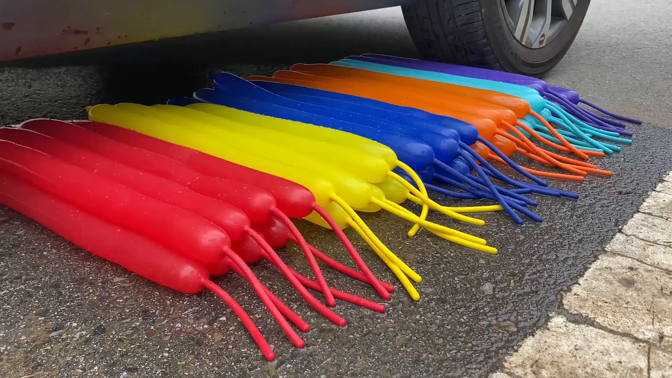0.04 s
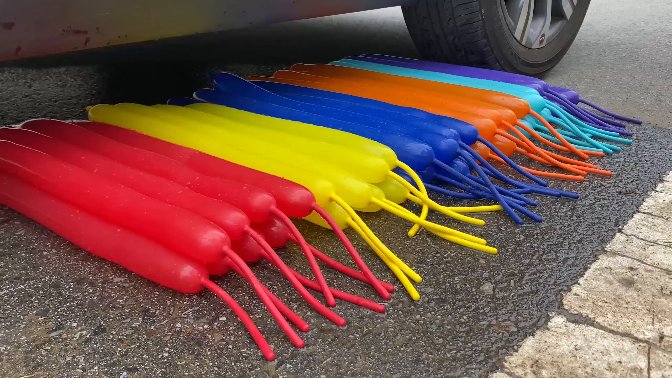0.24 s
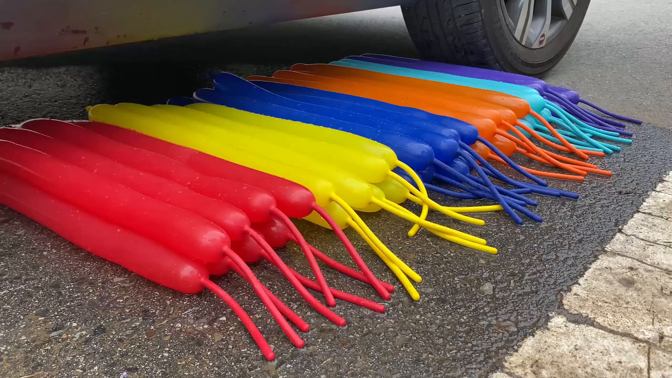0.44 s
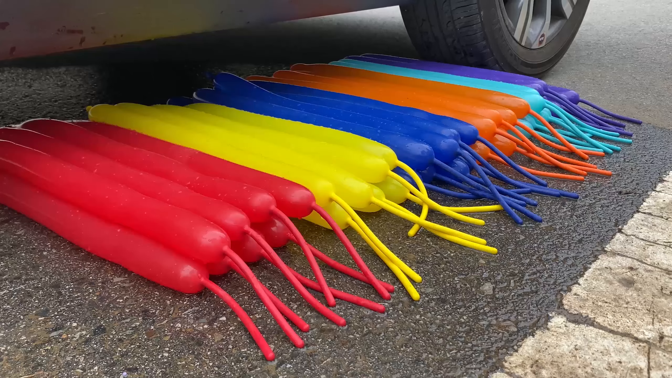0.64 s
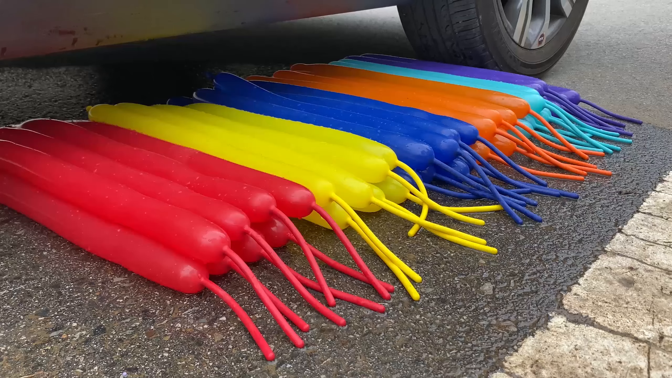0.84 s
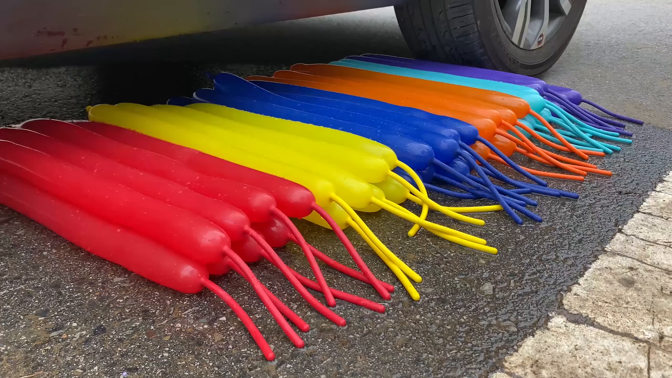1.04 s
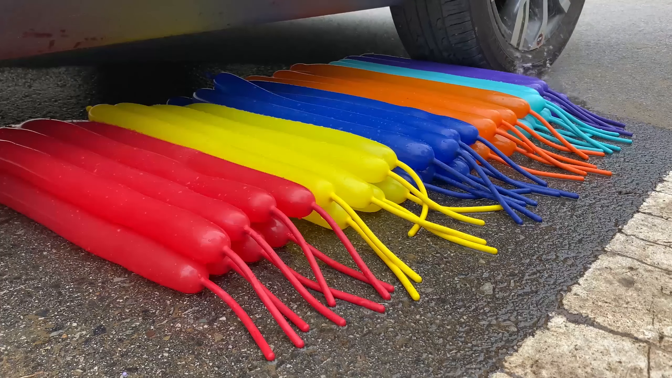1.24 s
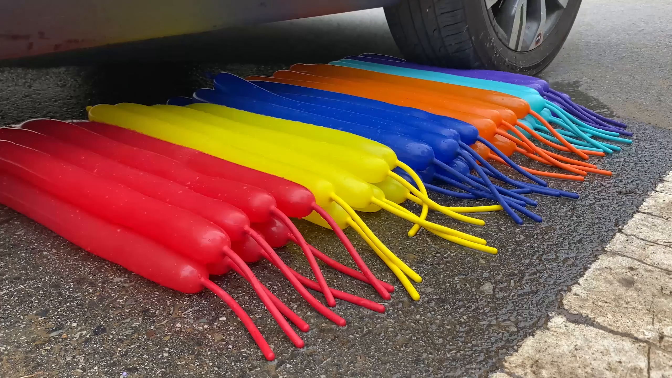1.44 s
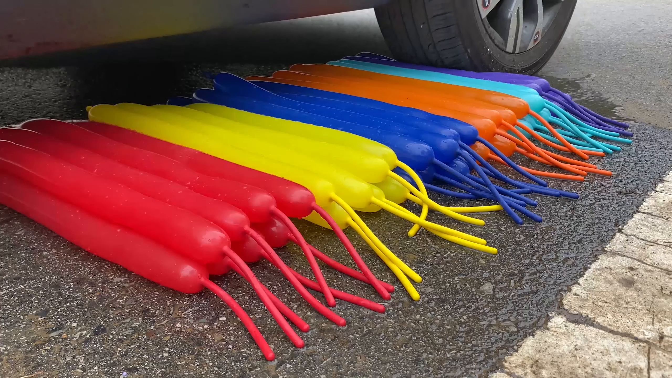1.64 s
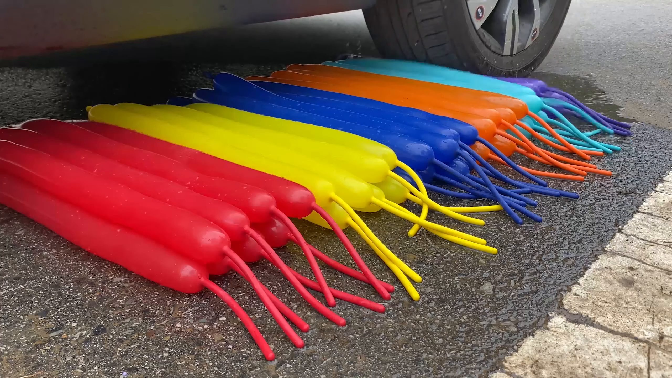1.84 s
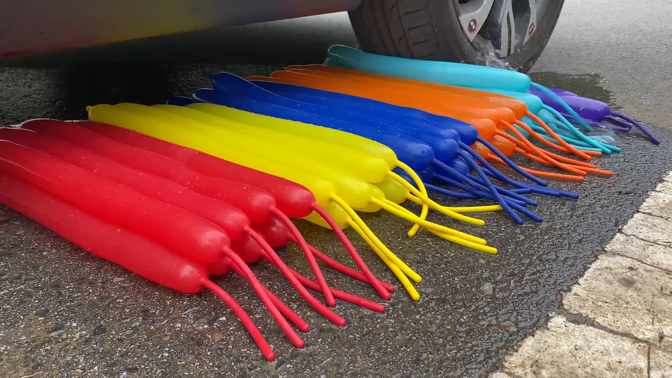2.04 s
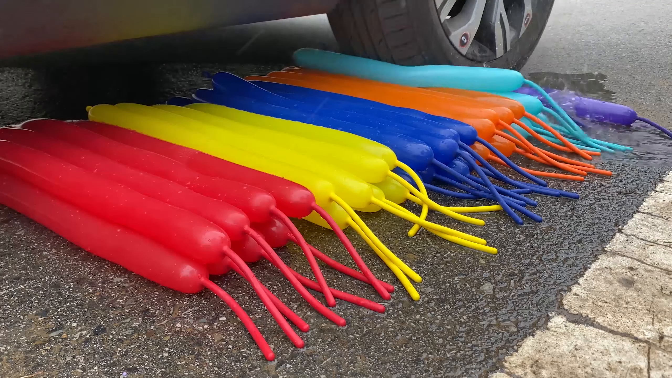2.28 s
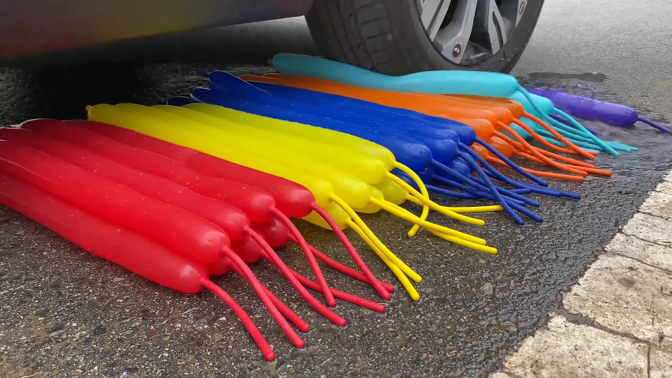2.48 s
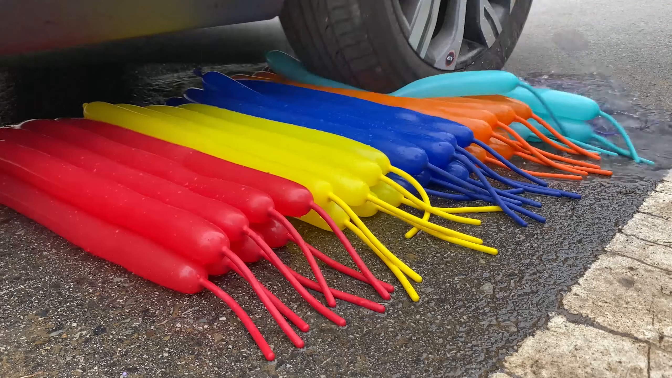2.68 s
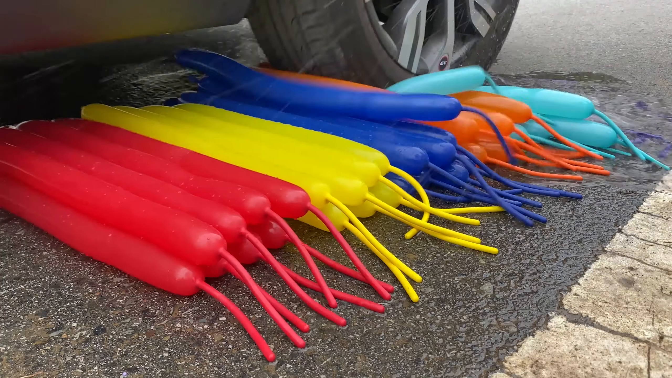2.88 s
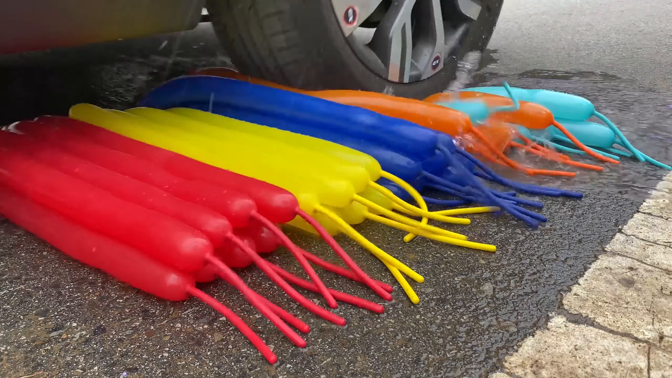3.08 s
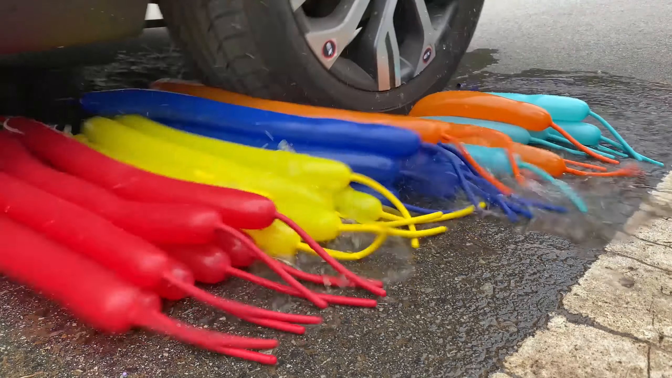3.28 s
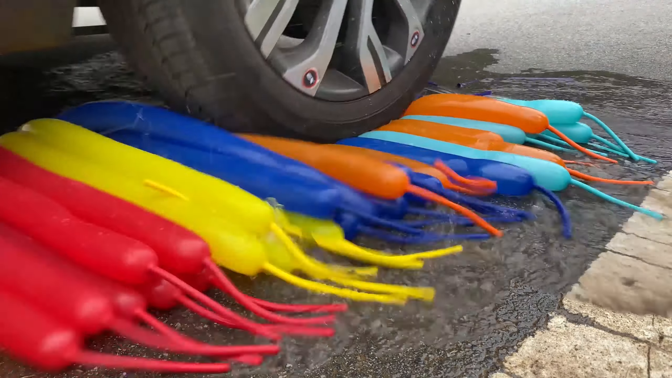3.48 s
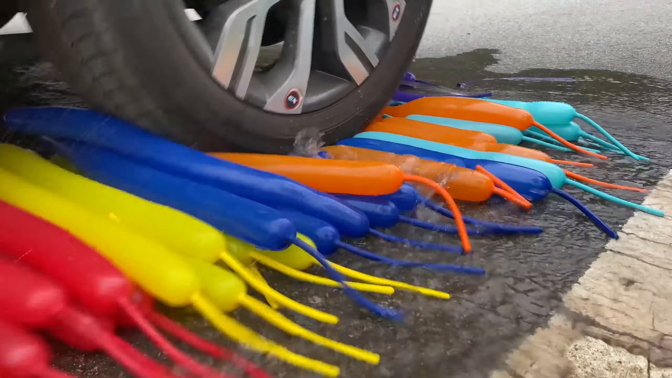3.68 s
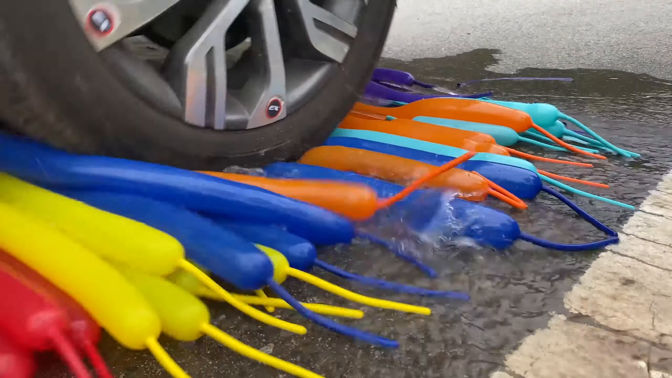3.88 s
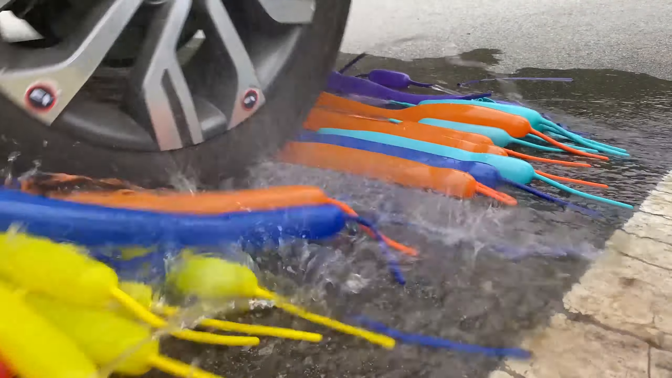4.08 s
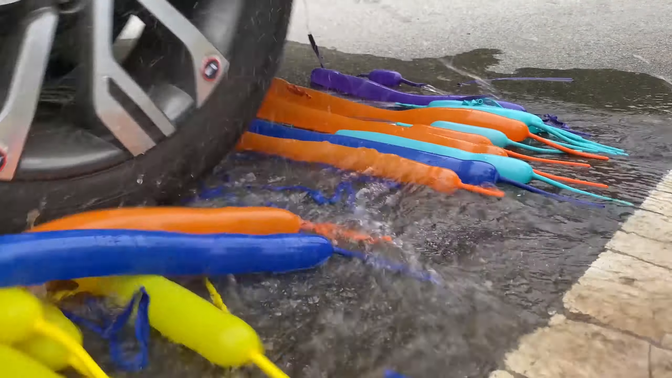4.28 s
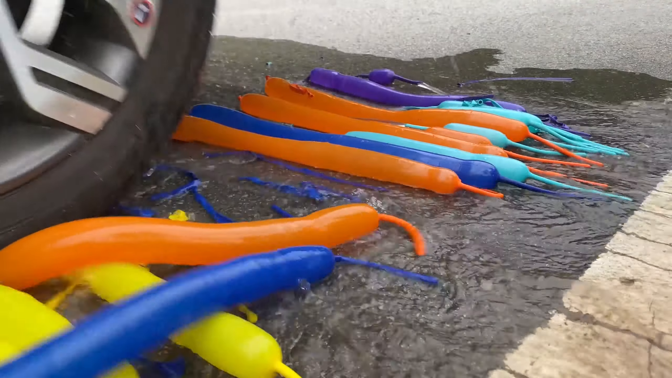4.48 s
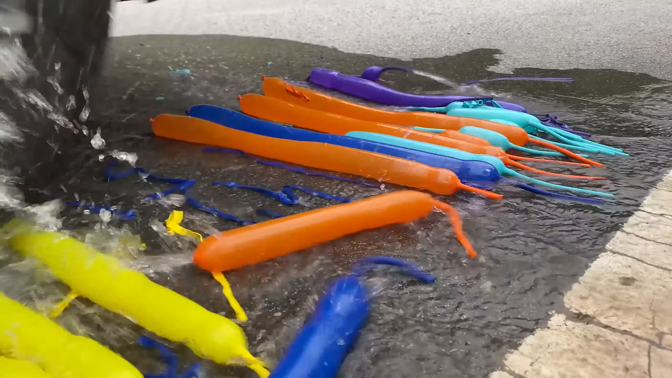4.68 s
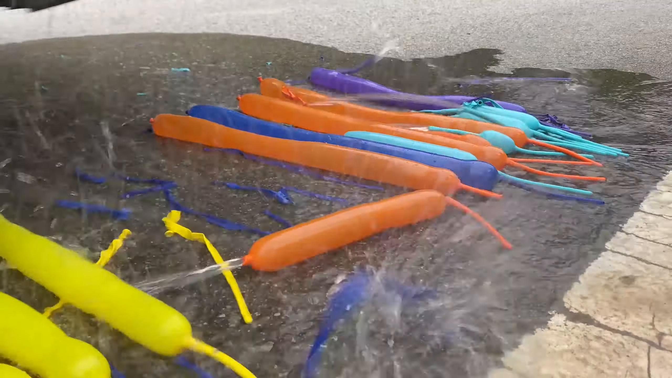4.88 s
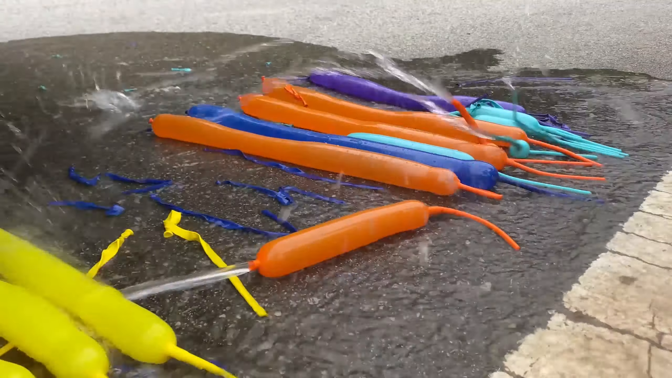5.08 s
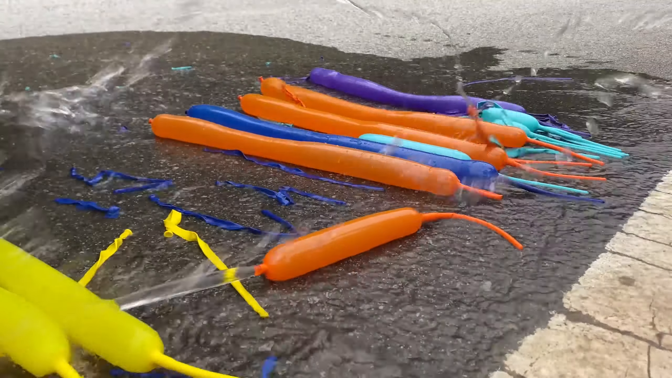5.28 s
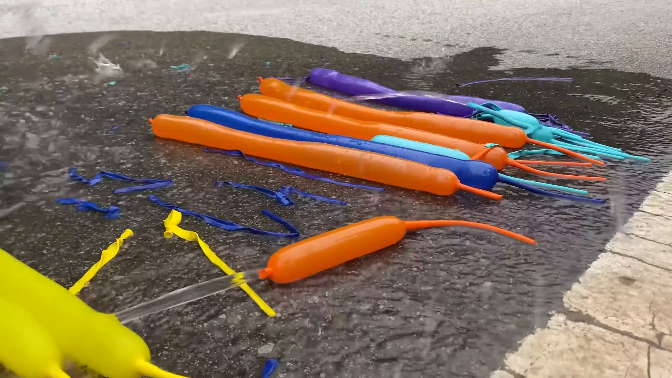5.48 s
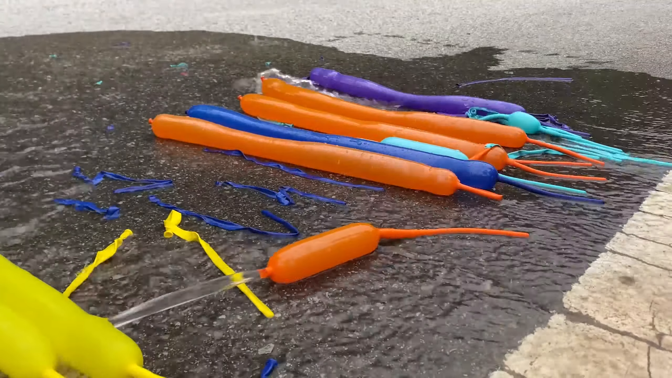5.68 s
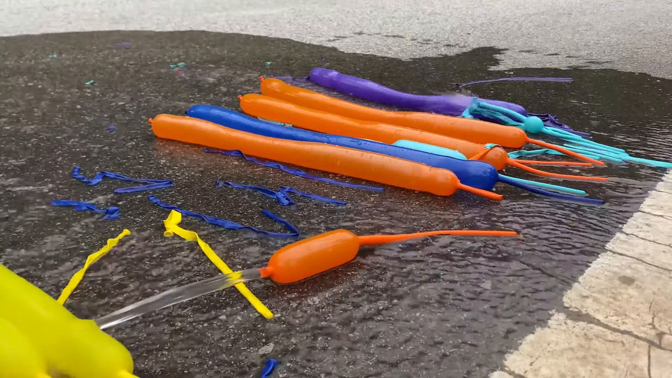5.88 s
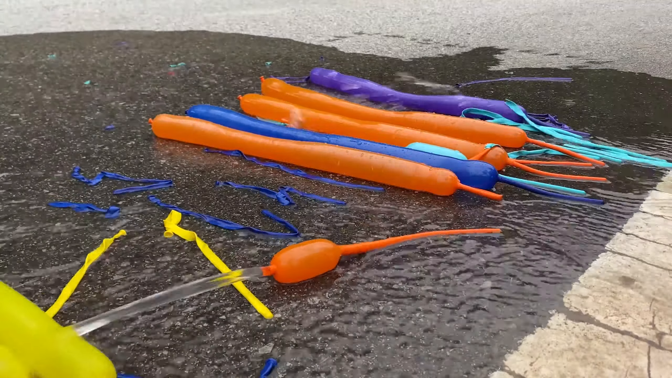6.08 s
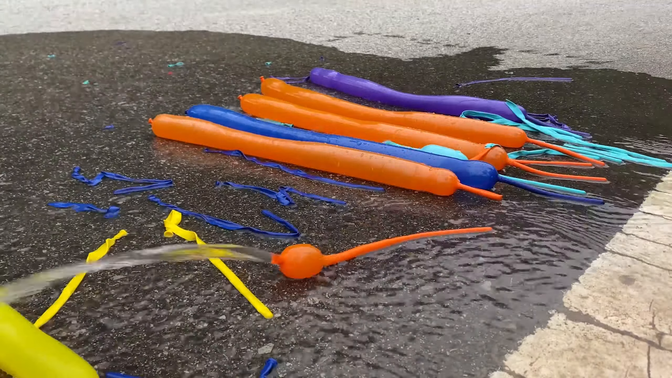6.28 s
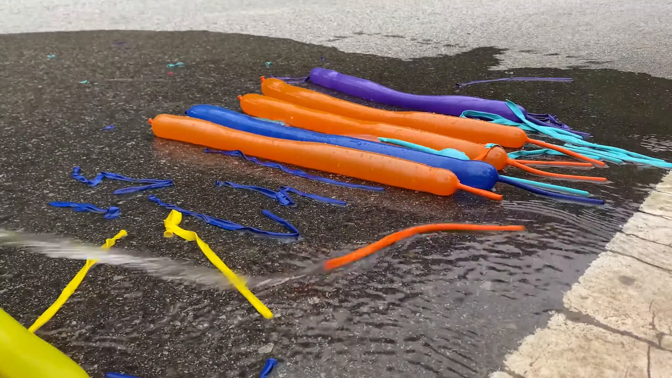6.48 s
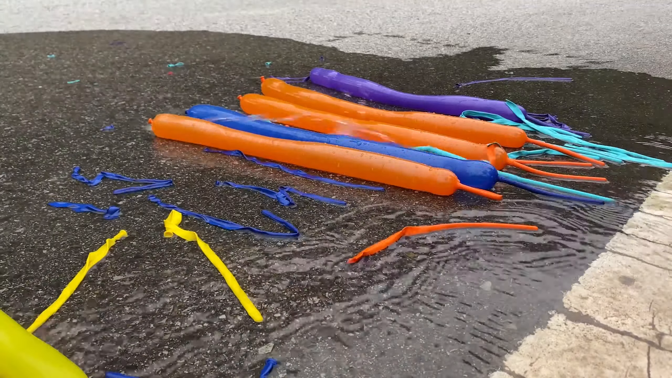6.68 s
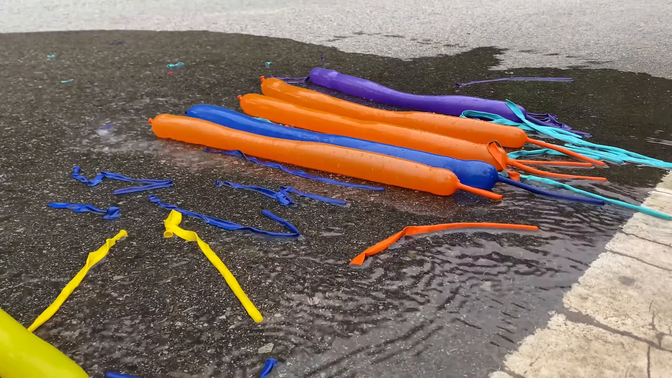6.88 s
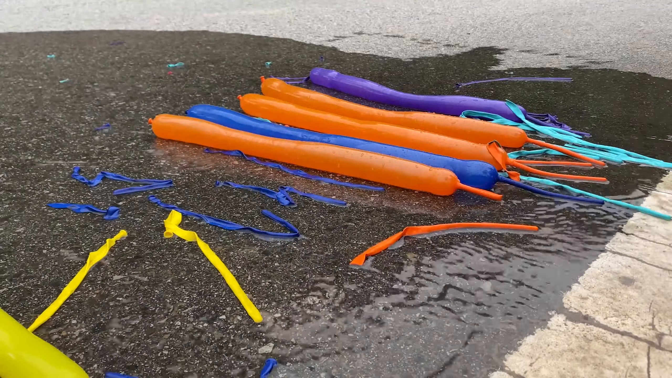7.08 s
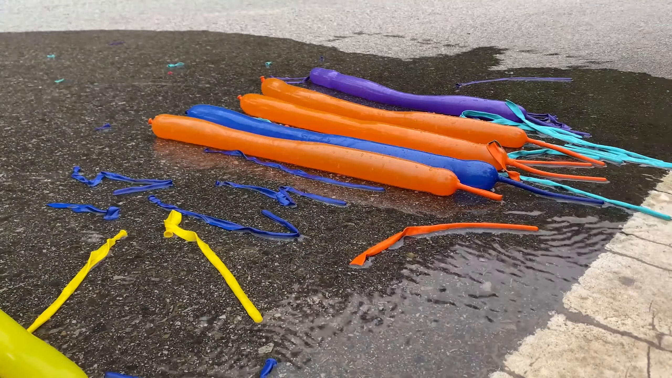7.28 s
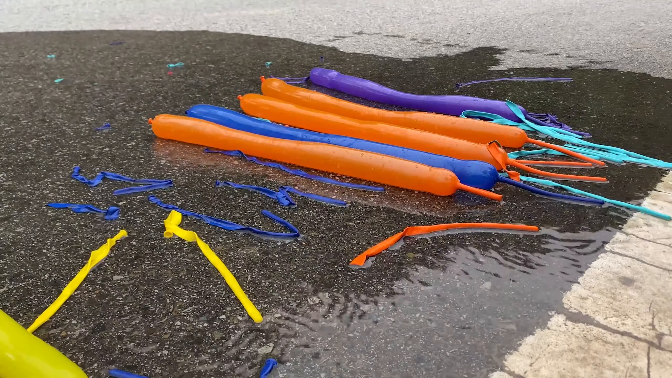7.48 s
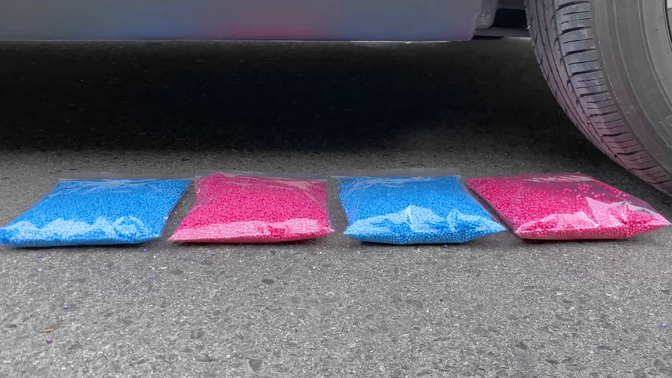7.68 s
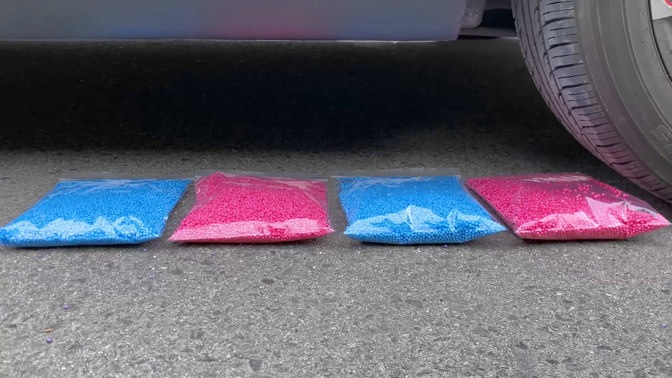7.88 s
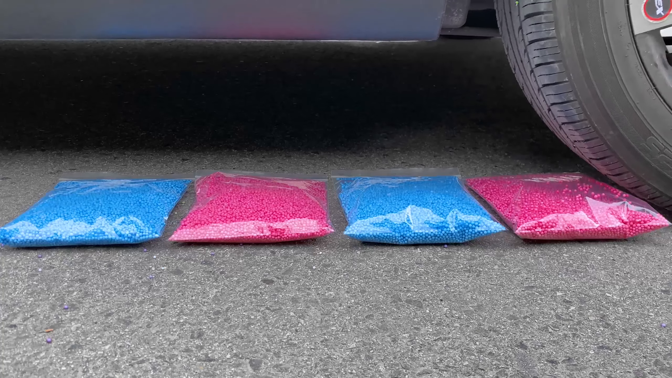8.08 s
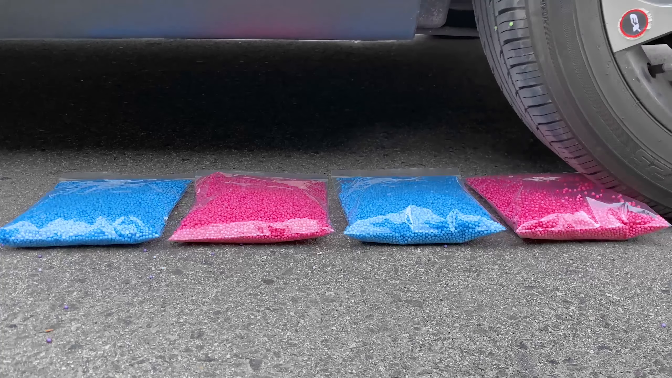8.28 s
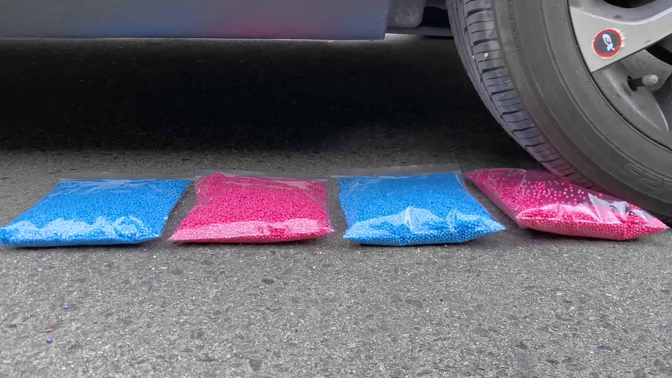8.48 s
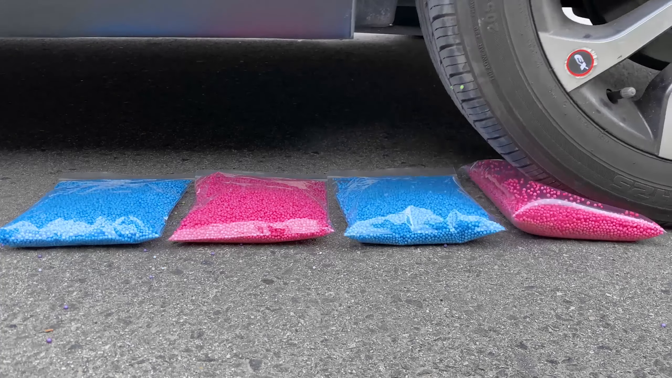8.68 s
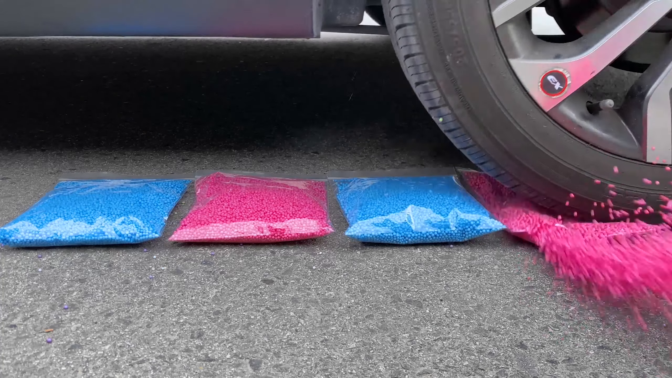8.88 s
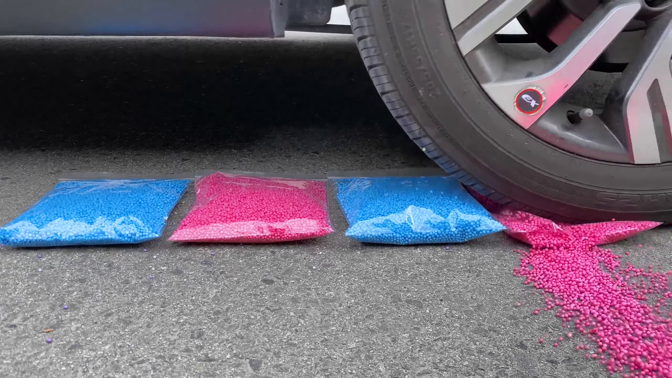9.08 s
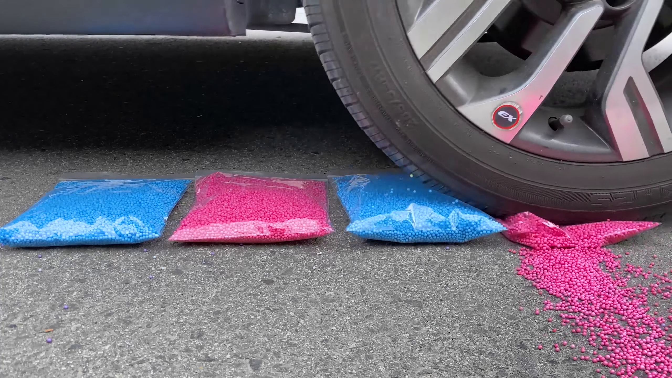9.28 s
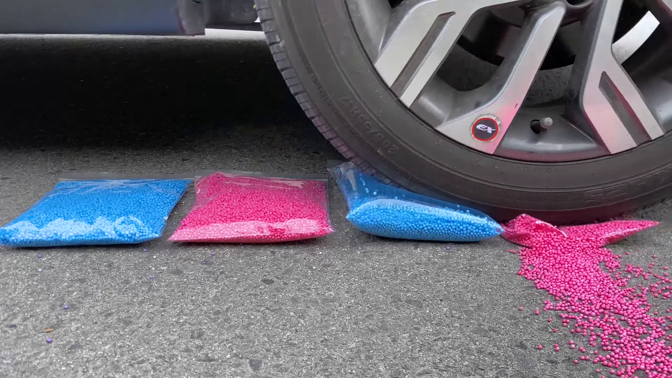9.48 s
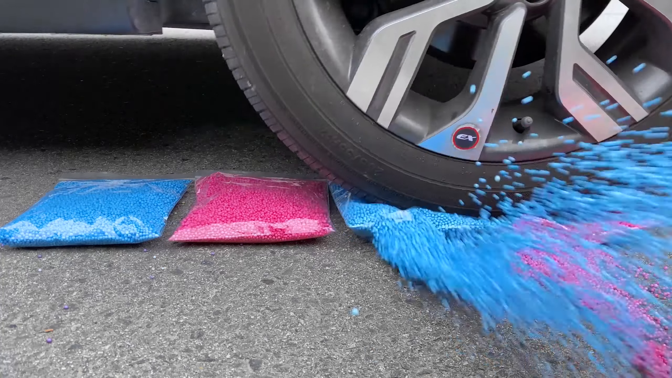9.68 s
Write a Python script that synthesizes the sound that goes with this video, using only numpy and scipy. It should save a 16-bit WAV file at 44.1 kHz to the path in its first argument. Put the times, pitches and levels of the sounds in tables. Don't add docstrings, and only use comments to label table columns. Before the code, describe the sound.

A very short aerosol hiss gives way to a low engine idle with a faint belt whistle. Water balloons burst under a tyre in a dense, close, distorted barrage of rips, slaps and bubbling water. After the loudest pop the sound drops away; isolated tears follow, then tiny dripping and bubbling. An abrupt change brings low engine hum, creaking plastic and two booming packet bursts with light bead rattle between.

```python
import sys
import numpy as np
from scipy import signal
from scipy.fft import rfft, irfft, next_fast_len
from scipy.io import wavfile

SR = 44100
rng = np.random.default_rng(int(sys.argv[2]) if len(sys.argv) > 2 else 0)


def gain_from_db(level_db):
    decades = np.asarray(level_db, float) / 20
    return 10 ** decades


def generate_wav(sig):
    pcm = np.round(np.clip(np.atleast_2d(sig).T, -1, 1) * 32767).astype(np.int16)
    wavfile.write(sys.argv[1], SR, pcm)


N = 429534
TIME = np.arange(N) / SR
FIRING_HZ = 25.3
ROLL_LUMPS_DB = 2

# time in seconds, engine level in dB, water flow level in dB.
CRUSHING = [(1.8448, -28.5, -36), (2.04, -27.5, -42), (2.69, -28.5, -42), (2.91, -27.5, -35.5),
            (3.23, -25, -29.5), (3.77, -27.5, -37.5), (4.1, -33, -32.5), (4.44, -27, -40),
            (4.78, -31.5, -39), (4.92, -31.5, -63)]
# time in seconds, engine level in dB, water flow level in dB.
EMPTYING = [(5.518, -63, -56.5), (5.639, -65, -60.5), (6.06, -67, -57.5), (6.408, -63, -63),
            (6.609, -61, -57.5), (6.76, -58, -54), (6.921, -50, -68), (7.01, -50.5, -62), (7.608, -52, -67)]
# time in seconds, engine level in dB, bead flow level in dB.
SPILLING = [(8.93, -54, -79), (8.995, -61.5, -76), (9.183, -45.5, -58.5), (9.455, -46.5, -61),
            (9.52, -44.5, -50), (9.576, -48, -55), (9.635, -46, -59)]


def at_hz(points, hz):
    table_hz, value = np.transpose(points)
    return np.interp(np.log(hz + 1), np.log(table_hz + 1), value)


def drift(rate, size):
    knots = rng.standard_normal(int(size / SR * 400) + 3)
    return np.interp(np.arange(size) / SR * np.clip(rate, 1, 399), np.arange(len(knots)), knots)


def drops(spread_db, size):
    drop_size = np.minimum(rng.exponential(1, (2, size)), 4)
    return rng.standard_normal((2, size)) * gain_from_db(spread_db * drop_size)


def banded(noise, colour, flicker_db, peaks=(), first=0):
    band_edges_hz = [25, 250, 1500, 6000, 20000]
    size = noise.shape[1]
    hz = np.arange(size // 2 + 1) * SR / size
    resonance_db = sum(db / (1 + (2 * (hz - f) / width) ** 2) for f, width, db in peaks)
    spectrum = rfft(noise) * gain_from_db(at_hz(colour, hz) + resonance_db)
    octaves = np.log2(hz + 1)

    def above(cut_hz):
        return np.clip(.5 + 2 * (octaves - np.log2(cut_hz)), 0, 1)

    bands = []
    for low, high in zip(band_edges_hz[first:], band_edges_hz[first + 1:]):
        cuts = np.geomspace(low, high, num=3)
        shared = drift(8.3, size)
        swing_db = flicker_db * (low > 100)
        band = 0
        for a, b in zip(cuts, cuts[1:]):
            flicker = gain_from_db(swing_db * (shared / 3 + drift(45, size)))
            band = band + irfft(spectrum * (above(a) - above(b)), size) * flicker
        bands.append(band / np.std(band))
    return np.array(bands)


def bubbles(table, rise, trim_db):
    out = np.zeros((2, N))
    twins = rng.uniform(0, 2 * np.pi, (len(table), 1))
    for (s, db, hz, cycles), twin in zip(table, twins):
        cycles = max(cycles, 2)
        turn = np.arange(int(cycles / hz * SR)) * hz / SR
        swell = np.sin(np.pi / 2 * np.minimum(turn / 1.5, 1)) ** 2
        shape = gain_from_db(db + trim_db - 60 * turn / cycles / 2) * swell
        at = round((s - .5 / hz) * SR)
        out[:, at:at + len(turn)] += shape * np.sin(2 * np.pi * turn * (1 + rise * turn) + twin * [[0], [1]])
    return out


def froth(rows, low_hz, over_db, spread_db, count):
    chance = rng.random((count, 4))
    s = rows[0][0] + (rows[-1][0] - rows[0][0] - .05) * chance[:, 0]
    flow_db = np.interp(s, *np.transpose(rows)[[0, 2]])
    level_db = flow_db + over_db + spread_db * chance[:, 1] ** 2
    return np.transpose([s, level_db, low_hz * 6 ** chance[:, 2], 5 + 12 * chance[:, 3]])


def timed(table, ring_s):
    return [(s, db, hz, ring_s * hz) for s, db, hz in table]


def bursts():
    # start in seconds, peak in dB, brightness in dB, length in seconds.
    puff = [(0.0011, -22, 6.5, 0.0099)]
    # start in seconds, peak in dB, brightness in dB, length in seconds.
    tears = [(2.022, -12.5, 6.5, 0.17), (2.6855, -1, -2.5, 0.076), (2.733, -9, -2, 0.37),
             (2.9796, 0.5, -4, 0.29), (3.0276, -5.5, -3.5, 0.14), (3.1596, -4.5, 1.5, 0.13),
             (3.1837, -1.1, -8.5, 0.22), (3.323, -0.5, 0.5, 0.083), (3.5387, -5.5, -2.5, 0.18),
             (3.7953, -15.5, -6, 0.34), (4.117, 1.1, -2, 0.041), (4.1418, -8.5, 1.5, 0.16),
             (4.7265, -19, 2.5, 0.29), (3.209, -7, -2, 0.047), (4.8618, -8, 6.5, 0.36)]
    # start in seconds, peak in dB, brightness in dB,
    # length in seconds.
    surges = [(1.2074, -22, 3.5, 0.17), (1.8618, -6.5, -1.5, 0.17), (1.9338, -18.5, -21.5, 0.22),
              (2.0128, -11, -2, 0.26), (2.15, -12.5, 2.5, 0.094), (2.2822, -13.5, -1, 0.24),
              (2.334, -20, -20.5, 0.09), (2.8366, -6, -3, 0.17), (2.9994, -5, -15, 0.13),
              (3.1097, -5, -6.5, 0.13), (3.3478, -9, -16.5, 0.12), (3.3887, -21, -22.5, 0.4),
              (3.4433, -18.5, -25.5, 0.19), (3.485, -9, -11, 0.082), (3.512, -9.5, -17, 0.068),
              (3.8424, -15.5, -22, 0.057), (4.2344, -21, -2, 0.2), (4.8174, -10.5, -13.5, 0.11)]
    # start in
    # seconds, peak in dB, brightness in dB, length in seconds.
    cracks = [(8.631, -34.5, -12, 0.071), (8.655, -37, -12, 0.094), (8.7996, -28.5, 7, 0.1),
              (9.263, -40.5, -15, 0.032), (9.2928, -40, -17, 0.031), (9.338, -39.5, -7.5, 0.035),
              (9.5076, -23.5, -11, 0.036), (9.5135, -24.5, -9, 0.052), (9.5335, -21.5, -6, 0.015),
              (8.8475, -14.5, -11.5, .03), (5.118, -37, 5.5, 0.026), (5.411, -33.5, 4, 0.029),
              (5.461, -36.5, 8.5, 0.027)]
    # start in seconds, peak in dB,
    # brightness in dB, length in seconds.
    thin_tears = [(3.6472, -8, 5.5, 0.27), (5.1747, -5, -6.5, 0.091), (5.3001, -3.5, -4.5, 0.11),
                  (5.334, -12, 1, .05), (5.3405, -1, -3, 0.094)]
    # start in seconds, peak in dB, brightness in dB, length in seconds.
    rips = [(3.6618, -7.5, -7, 0.088), (3.9066, -7.5, 1.5, 0.1), (4.0515, -7, -1, 0.15),
            (4.4243, -9.5, 2, .2), (4.6269, -1, -1, 0.12), (4.7838, -6, 0, 0.15)]
    # start in seconds, peak in dB, brightness in dB,
    # length in seconds.
    slumps = [(8.864, -42, -12, 0.1), (9.677, -37.5, -18, 0.083)]
    # frequency in Hz, level in dB per Hz.
    spray = [(120, -31.5), (200, -6), (677, -8), (815, -5), (8000, -15), (12000, -13), (16000, -21)]
    # table, low part in dB, low dB lost per dB of brightness, share of the length at full gush.
    kinds = [(puff, -5.5, 0, 3.05), (tears, -5, 0.21, 0.013), (surges, 0.1, 0.29, 0.052), (cracks, 2.7, 0, 0),
             (thin_tears, -13.5, 0, 0.027), (rips, -7, .3, 0.29), (slumps, 14, 0, 0)]
    jet = drops(1.6, 2 ** 18)
    bands = np.tile(banded(jet, spray, 3.4, first=1), 2)[:, :, :N]
    power = np.zeros((3, N))
    age = np.arange(SR // 4) / SR
    for table, low_db, low_loss, gush_share in kinds:
        for s, db, bright_db, length in table:
            at = round(s * SR)
            # (dB, share of the length it lasts, rise s, tear dB)
            parts = [(low_db - low_loss * bright_db, 1.2, .002, 1.1), (0.082, 0.99, 0.00025, 0.52),
                     (bright_db, .8, .0001, 9.0)]
            for k, (part_db, lasts, rise, tear_db) in enumerate(parts):
                tail_db = -60 * np.maximum(age - gush_share * length, 0) / (lasts * max(length, .004))
                fade_db = tail_db + tear_db * np.exp(-300 * age)
                shape = gain_from_db(db - 10.5 + part_db + fade_db) * np.minimum(age / rise, 1)
                power[k, at:at + len(age)] += shape[:N - at] ** 2
    lumps = gain_from_db(1.6 * drift(120, N))
    return lumps * np.sum(np.sqrt(power)[:, None] * bands, axis=0)


def blasts():
    # time in seconds, level in dB, last crest in ms, left-right in dB, slow tail share.
    bangs = [
        (4.9245, -2, 12.6, 2.5, .28),
        (8.8546, 2.5, 9.9, -.6, -.06),
        (9.6659, 3, 10.1, 0, .1),
    ]
    # time in seconds, level in dB, last crest in ms,
    # left-right in dB.
    forerunners = [(4.9115, -6, 11.5, 1), (4.917, -3, 5.2, 6), (8.8335, -13, 12, -1.5),
                   (8.8428, -8, 6.2, -1.5), (9.643, -26, 12, 0), (9.654, -19, 6.5, 0)]
    out = np.zeros((2, N + SR))
    age = np.arange(1, SR // 10) / SR
    rows = [(*row, 0, 850) for row in forerunners] + [(*row, 16000) for row in bangs]
    for s, db, crest_ms, pan_db, tail, top_hz in rows:
        late = age * 1000 / crest_ms
        sweep = np.cos(2 * np.pi * np.log(late) / np.log(2.5))
        sweep *= np.exp(-.8 * late ** 2.5) * np.minimum(late / .05, 1)
        sweep += tail * 2 * late * np.exp(-late)
        lowpass = signal.butter(2, top_hz, fs=SR, output="sos")
        sweep = signal.sosfiltfilt(lowpass, np.r_[np.zeros(99), sweep])[99:]
        at = round(s * SR)
        out[:, at:at + len(age)] += gain_from_db(db + np.array([[.5], [-.5]]) * pan_db) * sweep
    return out[:, :N]


def squeals():
    # end in seconds, start pitch in Hz, end pitch in Hz, level in dB, left-right in dB.
    seams = [
        (8.855, 2500, 1800, -11, -10),
        (9.666, 2600, 1600, -20, -6),
    ]
    swell_s = .009
    out = 0
    for stop, from_hz, to_hz, db, pan_db in seams:
        along = np.clip(1 + (TIME - stop) / swell_s, 0, 1)
        hz = (from_hz + (to_hz - from_hz) * along) * (1 + .45 * np.tanh(drift(390, N)))
        tone = np.sin(2 * np.pi * np.cumsum(hz) / SR) * along * (TIME < stop)
        out = out + gain_from_db(db + np.array([[.5], [-.5]]) * pan_db) * tone
    return out


def glugs_and_slaps():
    # time in seconds, peak in dB, pitch in Hz.
    glugs = [(.004, -31, 830), (1.214, -27, 480), (1.742, -42.5, 915), (1.945, -19, 576),
             (2.589, -22, 1350), (2.686, -5.5, 1110), (2.737, -6.5, 1210), (3.113, 3, 463),
             (3.124, -13, 388), (3.170, -7, 1440), (3.217, -13.5, 810), (3.324, 0, 2000), (3.347, -5, 717),
             (3.443, -15.5, 298), (3.485, 2.5, 673), (3.672, -4.5, 920), (3.696, -6.5, 910),
             (3.961, -7, 1180), (3.993, -14, 743), (4.087, -8, 1420), (4.178, -8, 1320),
             (4.403, -19.5, 254), (4.489, -13, 620), (4.784, -2, 2434)]
    # time in seconds, peak in dB, pitch in Hz.
    slaps = [(1.863, -2.5, 590), (2.837, -1, 1850), (2.999, -3, 639), (3.189, -5, 520), (3.2656, 6, 1454),
             (3.497, 1.5, 260), (3.844, -7.5, 650), (4.067, -3.5, 518), (4.654, -3, 1820)]
    rows = [(*row, 10) for row in glugs] + [(*row, 4.4) for row in slaps]
    return bubbles(rows, rise=0.0013, trim_db=4.0)


def splash_pockets():
    # time in seconds, level in dB, pitch in Hz.
    blips = [(1.947, -23, 1960), (1.947, -20.5, 1270), (1.992, -27.5, 645), (2.15, -24.5, 2545),
             (2.283, -16.5, 466), (2.285, -35, 2470), (2.305, -20, 1290), (2.334, -23.5, 930),
             (2.683, -18, 810), (2.735, -23, 2040), (2.741, -22, 780), (2.834, -18, 2970),
             (2.835, -16.5, 3200), (2.836, -14.5, 1720), (2.849, -13, 1830), (2.868, -21, 1770),
             (2.877, -17.5, 700), (2.897, -21.5, 1120), (2.922, -27.5, 1050), (2.977, -19, 1124),
             (3.029, -17, 2680), (3.111, -5.5, 1497), (3.124, -24, 2950), (3.188, -16, 2030),
             (3.189, -15.5, 2490), (3.191, -16, 1430), (3.241, -25.5, 1640), (3.243, -20, 2000),
             (3.294, -26, 1080), (3.323, -24, 3400), (3.325, -11.5, 660), (3.388, -20, 800),
             (3.388, -25.5, 2476), (3.482, -24, 1504), (3.484, -26, 2261), (3.485, -17, 1200),
             (3.511, -19.5, 1670), (3.517, -15.5, 580), (3.537, -25, 1080), (3.542, -21, 1670),
             (3.722, -18, 904), (3.91, -28, 409), (4.035, -21.5, 1055), (4.06, -21.5, 2480),
             (4.079, -18, 1690), (4.153, -30, 736), (4.172, -24.5, 2460), (4.174, -19, 1480),
             (4.481, -22, 2360), (4.504, -18, 600), (4.626, -17, 3130), (4.674, -17.5, 3000),
             (4.821, -19, 2920), (4.825, -21.5, 1170), (4.828, -18, 732), (4.859, -18, 937),
             (2.505, -32.5, 950)]
    foam = froth(CRUSHING, low_hz=483, over_db=6.0, spread_db=9.0, count=1150)
    return bubbles(timed(blips, .018), rise=0.0018, trim_db=7.5) + bubbles(foam, rise=.012, trim_db=1)


def can():
    # frequency in Hz, level in dB.
    can_tones = [(824, -34), (1250, -40), (1567, -36), (2050, -39), (2400, -33), (11800, -37),
                 (14700, -27.5), (15100, -32)]
    shut_s = .031
    out = np.zeros((2, N))
    t = TIME[:SR // 20]
    tones = 0
    for hz, db in can_tones:
        rough = gain_from_db(db + 4 * drift(220, len(t)))
        tones = tones + rough * np.sin(2 * np.pi * hz * t + drift(150, len(t)))
    out[:, :len(t)] = tones * np.clip((shut_s - t) / .001, 0, 1)
    return out


def thuds():
    # time in seconds, peak in dB, pitch in Hz, cycles.
    knocks = [(0.009, -29.5, 59, 2.5), (1.225, -38, 120, 5.5)]
    return bubbles(knocks, rise=0, trim_db=13.5)


def trickle():
    # time in seconds, peak in dB, pitch in Hz.
    drips = [(5.5702, -40, 2094), (5.9101, -50, 5225), (6.0886, -40, 7160), (6.159, -31, 7660),
             (6.282, -47, 3730), (6.5056, -34, 6880), (6.567, -38, 4840), (6.592, -36.5, 2730),
             (6.6084, -38.5, 4710), (6.76, -41, 4520), (7.021, -44, 2470), (7.1066, -48, 2450),
             (7.271, -45, 3110), (7.3758, -46, 4680)]
    # time in seconds, level in dB, pitch in Hz.
    dribble = [(5.542, -60, 2590), (5.619, -55, 5410), (5.621, -60, 5820), (5.815, -58, 6330),
               (5.907, -65, 6309), (5.908, -56, 4960), (5.942, -60, 4737), (5.978, -53, 5297),
               (5.979, -55, 5965), (6.011, -50, 6220), (6.087, -55, 6240), (6.09, -58, 4460),
               (6.091, -57, 4880), (6.196, -61, 5420), (6.204, -61, 4500), (6.358, -56, 1597),
               (6.518, -55, 3200), (6.544, -58, 2360), (6.576, -56, 1350), (6.606, -52, 2620),
               (6.647, -54, 936), (6.664, -55, 1766), (6.667, -60, 2450), (6.746, -54, 1860),
               (6.757, -54, 4200), (6.766, -51.5, 2842), (6.82, -61, 2680), (6.831, -57, 1637),
               (6.836, -57, 1421), (6.859, -60, 1572), (7.104, -53, 2412), (7.118, -56, 3290),
               (7.169, -57, 2095), (7.372, -56, 4900), (7.417, -58, 950),]
    clusters = gain_from_db(5 * drift(16, N))
    foam = froth(EMPTYING, low_hz=1700, over_db=2, spread_db=8, count=900)
    gulps = froth(EMPTYING[3:7], low_hz=1120, over_db=-2.0, spread_db=8.5, count=420)
    out = bubbles([(*row, 18) for row in drips], rise=.005, trim_db=4.5)
    out += clusters * bubbles(foam, rise=.015, trim_db=0)
    out += bubbles(gulps, rise=0.012, trim_db=4.0)
    return out + bubbles(timed(dribble, 0.018), rise=0.0011, trim_db=10.5)


def beads():
    # time in seconds, level in dB, pitch in Hz.
    bead_ticks = [(9.164, -64, 1486), (9.184, -60, 4100), (9.209, -66, 2680), (9.261, -56, 2700),
                  (9.261, -49, 2400), (9.268, -62, 3760), (9.333, -42, 1250), (9.364, -61, 2297),
                  (9.376, -58.5, 883), (9.461, -57, 2283), (9.531, -35.5, 2560), (9.531, -43, 2150),
                  (9.532, -52, 1560), (9.532, -42, 3330)]
    rolling_out = froth(SPILLING, low_hz=1000, over_db=7.0, spread_db=2, count=200)
    out = bubbles(rolling_out, rise=0, trim_db=0.5)
    return out + bubbles(timed(bead_ticks, 0.0156), rise=0, trim_db=6.5)


def strays():
    # time in seconds, level in dB, pitch in Hz.
    lone = [(1.211, -37, 770), (1.212, -36, 1100), (1.213, -48, 1720), (1.355, -52, 1460),
            (4.984, -57, 420), (5.045, -60, 740), (5.585, -57, 862)]
    near = bubbles(timed(lone[:4], 0.02), rise=0.00091, trim_db=11.0)
    return near, bubbles(timed(lone[4:], 0.02), rise=.0011, trim_db=11.0)


def engine_orders(t):
    # multiple of the firing rate, level in dB re engine.
    idle_orders = [(1, -15), (2, -5.5), (3, -6.5), (4, -5), (5, -11), (8, -12)]
    # multiple of the firing rate, level in dB re engine.
    parked_orders = [(1, -19), (2, -4), (3, -8), (4, -6), (5, -13.5), (7, -10.5), (8, -16)]
    # multiple of the firing rate, level in dB re engine.
    roll_orders = [(3, -5), (4, -9), (6, -7.5), (8, -10)]
    # multiple of the firing rate, level in dB re engine.
    creep_orders = [(2, -5.5), (3, -3.5), (6, -12), (9, -7)]
    # time in seconds, firing rate in Hz.
    speed = [(1.8, 25.3), (1.85, 24.7), (3.3, 25), (4.9, 26.6), (5.1, 28.1), (7.61, 28.1), (7.615, 23.4)]
    if t[0] < 5.1:
        orders = idle_orders
    elif t[0] < 7.6:
        orders = parked_orders
    else:
        orders = roll_orders if t[0] < 8.9 else creep_orders
    turns = 2 * np.pi * (np.cumsum(np.interp(t, *np.transpose(speed))) / SR + .012 * drift(4, len(t)))
    out = 0
    for order, db in orders:
        lope = 1 + .8 * (order > 7) * np.sin(turns / 2)
        out = out + gain_from_db(db + drift(4.8, len(t))) * lope * np.sin(order * turns)
    return out


def bed_levels(rows, blend):
    s, engine_db, flow_db = np.transpose(rows)
    gurgle_db, spill_db, mist_db, thinning_db = blend
    low_db = 20 * np.log10(np.hypot(gain_from_db(flow_db + gurgle_db), gain_from_db(engine_db + spill_db)))
    return s, [engine_db, low_db, flow_db, flow_db + mist_db - thinning_db * (s - s[0])]


def bed(rows, blend, colour, spread_db, flicker_db):
    # frequency in Hz, width in Hz, dB over the bed.
    fan_hum = [(576, 11, 12.5)]
    # frequency in Hz, width in Hz, dB over the bed.
    puddle = [(2700, 1400, 8), (4700, 720, 7)]
    # frequency in Hz, width in Hz, dB over the bed.
    creep_hum = [(616, 60, 6.9), (821, 70, 7.1), (1000, 48, 14), (2300, 51, 7.4)]
    s, levels = bed_levels(rows, blend)
    start, stop = int(max(s[0], 0) * SR), min(int(s[-1] * SR), N)
    length = stop - start
    size = next_fast_len(length)
    t = (start + np.arange(size)) / SR
    peaks = fan_hum if s[0] < 3 else creep_hum if s[0] > 7.6 else puddle
    bands = banded(drops(spread_db, size), colour, flicker_db, peaks)
    bands[0] = .4 * bands[0] + engine_orders(t)
    mixed = sum(gain_from_db(np.interp(t, s, db)) * band for db, band in zip(levels, bands))
    out = np.zeros((2, N))
    out[:, start:stop] = mixed[:, :length] * signal.windows.tukey(length, 90 / length)
    return out


def beds():
    # time in seconds, engine level in dB, water or bead flow level in dB.
    waiting = [(0, -52, -61), (.342, -40, -60), (.464, -45, -63), (.57, -50, -62), (1.732, -50, -60.5),
               (1.845, -48, -60)]
    hushed = [(4.94, -47.5, -87), (4.999, -54, -63.5), (5.119, -60.5, -64.5)]
    draining = [(5.118, -49.5, -41), (5.28, -44.5, -43), (5.366, -41.5, -39.5), (5.46, -55, -39),
                (5.516, -65, -46)]
    rolling = [(7.613, -74.5, -78), (7.619, -48, -60.5), (8.575, -47.5, -59.5), (8.655, -52, -49.5),
               (8.724, -49, -57.5), (8.751, -46.5, -52)]
    first_squeeze = [(8.751, -37.5, -44.5), (8.829, -28, -43.5), (8.855, -41, -24.5), (8.864, -34.5, -48),
                     (8.93, -50.5, -78)]
    second_squeeze = [(9.634, -52, -69), (9.664, -28.5, -35.5), (9.68, -37.5, -44), (9.74, -45, -75)]
    # frequency in Hz, level in dB per Hz.
    idling = [(30, -40.5), (104, -16), (252, -21), (1630, -27), (2610, -24), (4260, -32), (8000, -32),
              (16000, -32)]
    flooding = [(18, -47.5), (30, -11.5), (199, -0.5), (311, -16.5), (2490, -19), (8000, -31),
                (12000, -31.5), (16000, -34.5)]
    trickling = [(30, -14.5), (116, -14.5), (204, -18), (420, -17), (1150, -20), (2430, -25), (8000, -20),
                 (12000, -25.5), (16000, -46)]
    spraying = [(30, -4), (116, -12), (204, -29.5), (420, -35.5), (1100, -24), (2800, -26.5), (8000, -30.5),
                (16000, -40)]
    creeping = [(30, -15), (137, -11), (340, -18), (640, -14.5), (1320, -23.5), (5010, -37.5),
                (8000, -33.5), (16000, -38)]
    # gurgle in dB re flow, engine heard in the gurgle in dB, mist in dB re flow,
    # mist thinning in dB per second.
    blends = [(3, -14, -2, 0.5), (0.5, -24, -7.5, -4.5), (-1, -25, -1, 1), (-8, -26, 1, 0.5),
              (-13.5, -14, 6.5, 5.5), (2.5, -7, 0, 2.5), (5, -9.5, -6, 38), (3, -13, 6, 14.5),
              (11, -12, -4.5, 31)]
    jet_flicker_db = 2.8
    # levels, colour, drop size spread in dB, flicker in dB.
    kinds = [(waiting, idling, 1.6, 1.9), (CRUSHING, flooding, 8.3, 2), (hushed, trickling, 3, 1.3),
             (draining, spraying, 4.5, jet_flicker_db), (EMPTYING, trickling, 6.8, jet_flicker_db),
             (rolling, creeping, 1.7, 2.33), (first_squeeze, creeping, 1.8, ROLL_LUMPS_DB),
             (SPILLING, creeping, 3.5, 2.2), (second_squeeze, creeping, 2.2, 2.1)]
    return [bed(rows, blend, *kind) for (rows, *kind), blend in zip(kinds, blends)]


def gust():
    # time in seconds, level in dB.
    roll = [(.12, -72), (.22, -48.5), (.4, -43.5), (.52, -68)]
    band = signal.butter(4, [125, 480], "band", fs=SR, output="sos")
    low = signal.sosfilt(band, rng.standard_normal((2, N)))
    level_db = np.interp(TIME, *np.transpose(roll), left=-120, right=-120) + ROLL_LUMPS_DB * drift(37, N)
    return low / np.std(low) * gain_from_db(level_db)


def whine():
    # time in seconds, level in dB.
    belt = [(.05, -71.5), (1.845, -65.5), (1.846, -45.5), (2.7, -44.5), (3.3, -63)]
    belt_hz = 2586
    band = signal.butter(2, [belt_hz - 60, belt_hz + 60], "band", fs=SR, output="sos")
    tone = signal.sosfilt(band, rng.standard_normal((2, N)))
    flutter_db = 5.0 * np.sin(2 * np.pi * FIRING_HZ * TIME) + 3.0 * drift(19, N)
    level_db = np.interp(TIME, *np.transpose(belt), left=-120, right=-120)
    return tone / np.std(tone) * gain_from_db(level_db + flutter_db)


def ports(pair, from_side):
    # frequency in Hz, likeness from 0 to 1.
    likeness = [(60, .985), (200, .88), (800, .62), (2400, .55), (4000, .6), (5500, .45), (7000, .93)]
    # frequency in Hz, left-right in dB.
    pan = [(100, .8), (600, 3.3), (1400, 1.5), (5000, 3.5), (7500, 0)]
    # frequency in Hz, lead of the left in half turns.
    port_phase = [(0, 0), (400, .14), (6500, .16), (7200, -.03),
                  (8600, -.8)] + [ (hz + edge, -1 - k) for k, hz in enumerate([9025, 11125, 13250, 15225]) for edge in (-290, 270)]
    # frequency in Hz, lead in half turns.
    side_phase = [(0, 0), (3300, 2.4), (3900, 1.8), (5500, 2.15), (6900, 2)]
    size = next_fast_len(N + 4096)
    hz = np.arange(size // 2 + 1) * SR / size
    alike = np.clip(at_hz(likeness, hz), from_side * .76, 1)
    same, twin = rfft(pair, size)
    side_lead = from_side * np.interp(hz, *np.transpose(side_phase))
    lead = np.pi * (np.interp(hz, *np.transpose(port_phase)) + side_lead)
    right = (alike * same + np.sqrt(1 - alike ** 2) * twin) * np.exp(-1j * lead)
    tilt = gain_from_db(at_hz(pan, hz) / 2)
    return irfft([same * tilt, right / tilt], size)[:, :N]


def scene():
    quiet = beds()
    flood = quiet.pop(1)
    near_strays, far_strays = strays()
    near = flood + bursts() + glugs_and_slaps() + splash_pockets() + can() + thuds() + near_strays + gust()
    far = sum(quiet) + trickle() + beads() + far_strays + whine()
    dull = signal.sosfilt(signal.butter(2, 11050, fs=SR, output="sos"), near)
    near = np.where(TIME < 5, near, dull)
    ducked = np.interp(TIME, [4.926, 4.94, 5.1, 5.101], [1, 0, 0, 1])
    return ducked * ports(near, False) + ports(far, True) + blasts() + squeals()


def band_limit(x):
    return signal.sosfilt(signal.butter(12, 16610, fs=SR, output="sos"), x)


def record(dry):
    lowpass = signal.cheby2(16, 40, 16300, fs=SR, output="sos")
    cut = signal.sosfilt(lowpass, dry)
    return band_limit(np.clip(cut, -1, 1))


dry = scene()
out = record(dry)
generate_wav(out)
```